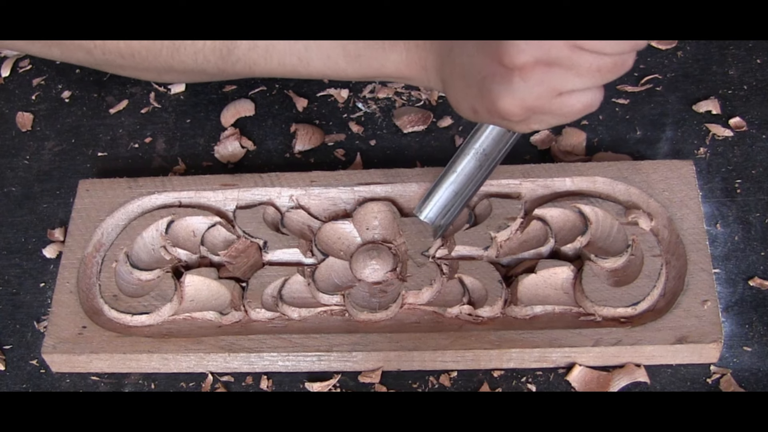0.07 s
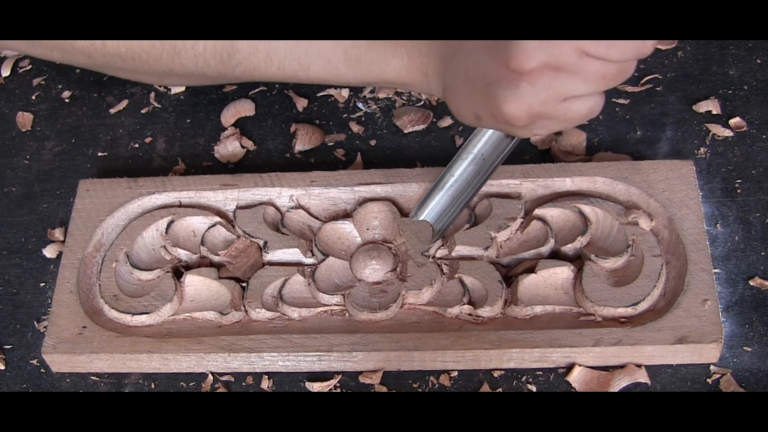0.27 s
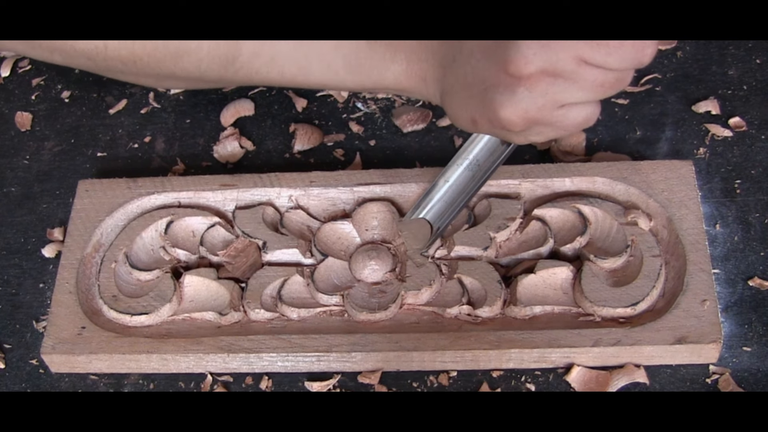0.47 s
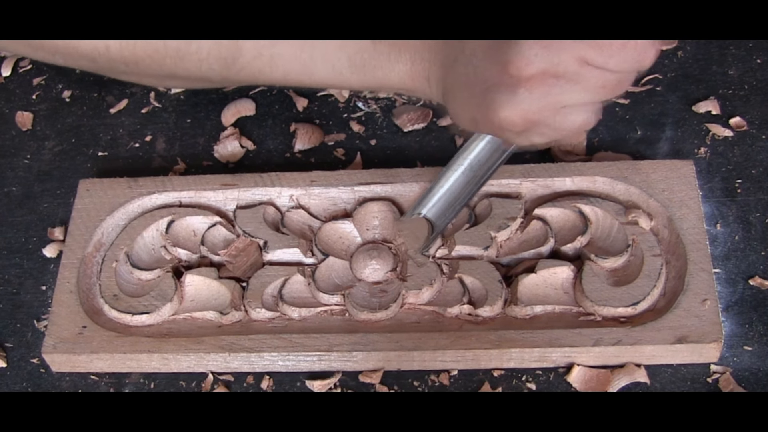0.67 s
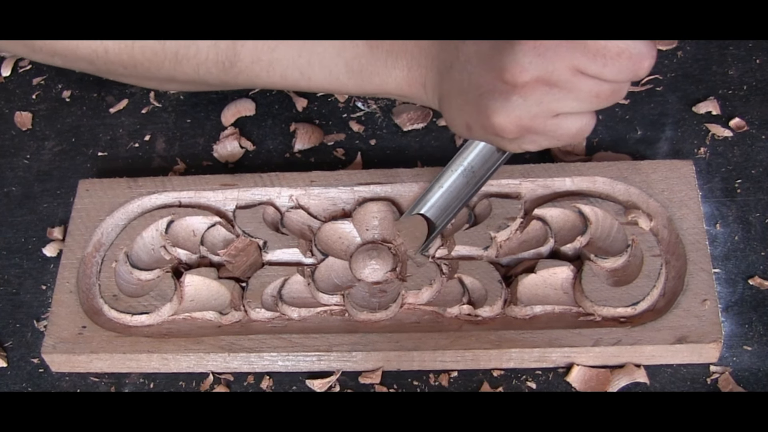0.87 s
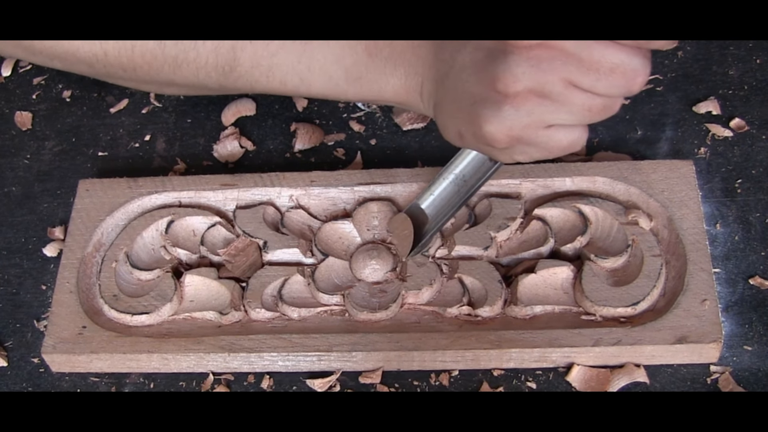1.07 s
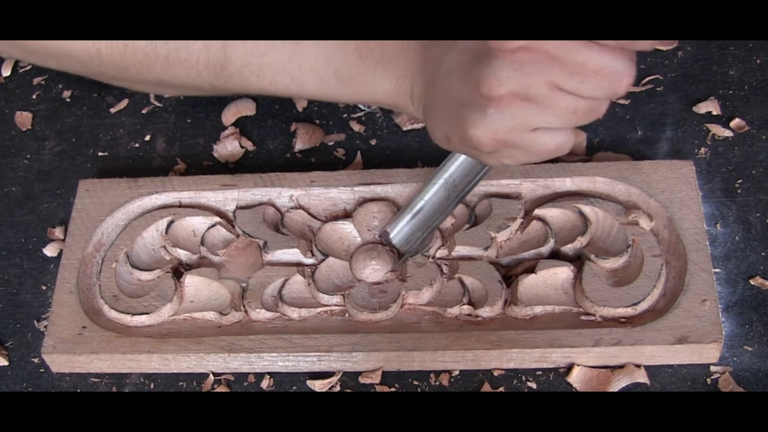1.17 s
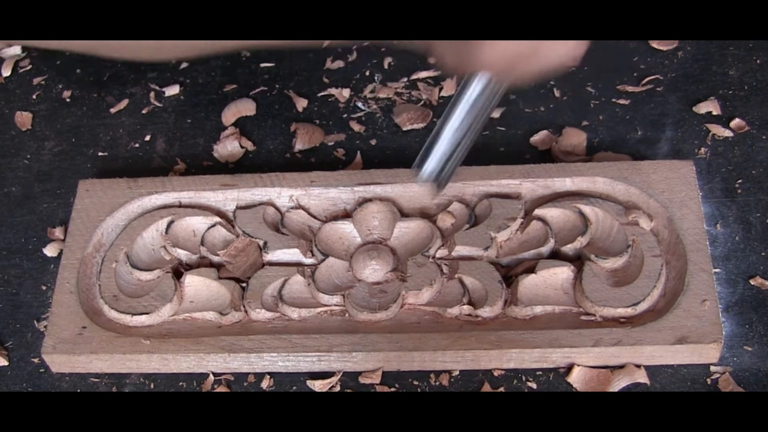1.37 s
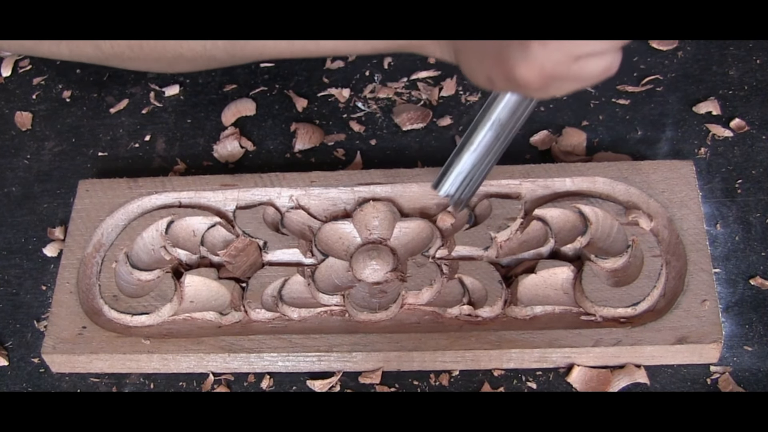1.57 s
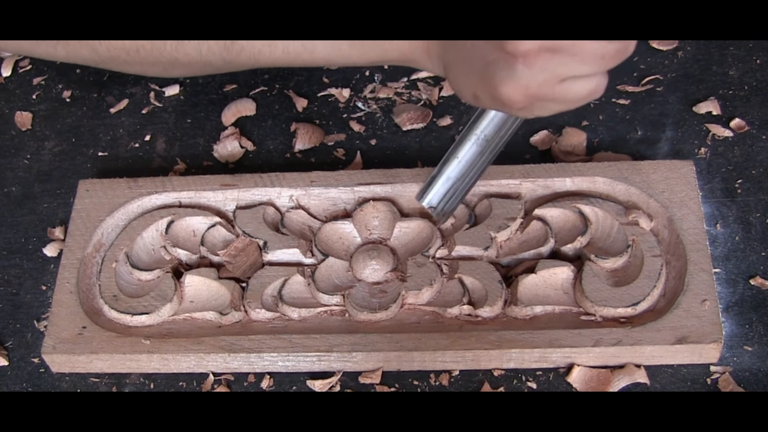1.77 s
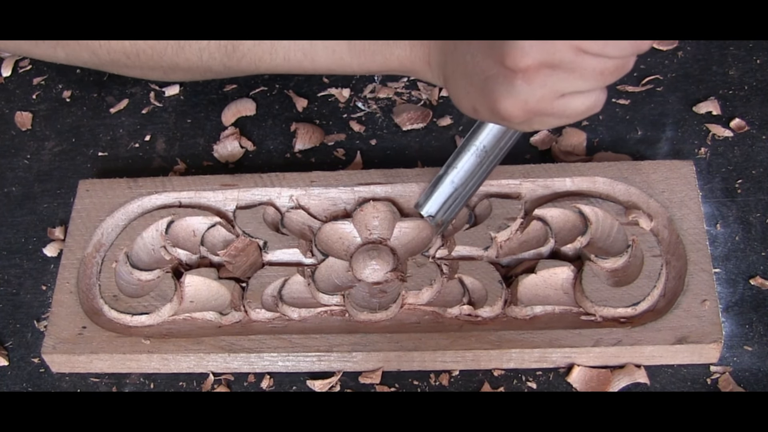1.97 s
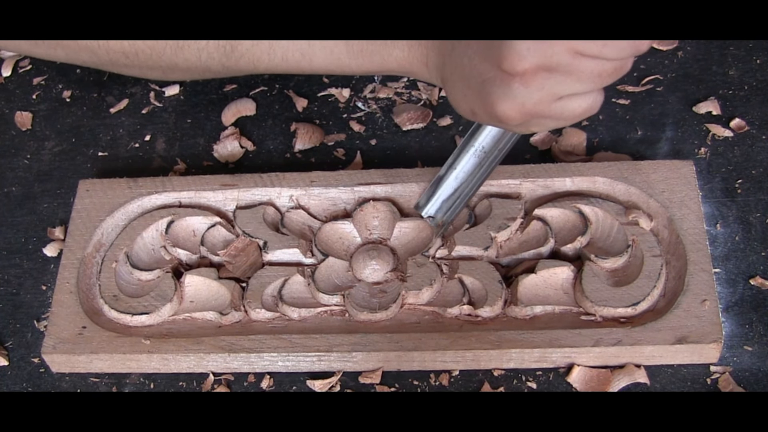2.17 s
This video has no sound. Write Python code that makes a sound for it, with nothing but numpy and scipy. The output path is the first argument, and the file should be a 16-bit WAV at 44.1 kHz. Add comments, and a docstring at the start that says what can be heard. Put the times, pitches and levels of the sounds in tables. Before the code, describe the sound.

A mallet taps a carving gouge into a wooden board: the fading tail of an earlier blow, then dry, cracking knocks at about 0.23, 0.49, 0.72, 0.95 and 1.17 seconds, the third hardest, the last softer and lower. Short room reflections swell after each. The gouge lifts with a tick at 1.34, a chip drops faintly at 1.64, and very soft bumps follow at 1.96 and 2.14 over low hiss.

```python
"""A wooden mallet taps a carving gouge into a board clamped on a bench in a small workshop.
Each blow is a few contacts ringing decaying modes of handle, board and bench, plus noise for crack and rustle.
Banded noise reflections fill the room; the recorder's limiter ducks under each blow and lets the tail swell back.
After the run the gouge lifts out with a tick, a chip drops (grit over short modes), and the hand settles
with soft bumps (low board modes) over a quiet room hiss of flickering noise bands."""
import sys
import numpy as np
from scipy import signal
from scipy.io import wavfile

SR = 44100
rng = np.random.default_rng(int(sys.argv[2]) if len(sys.argv) > 2 else 0)


def dump(signal):
    """Clip the signal to [-1, 1] and save it as 16-bit WAV at the path in sys.argv[1]."""
    limited = np.clip(np.atleast_2d(signal).T, -1, 1)
    pcm = np.round(limited * 32767).astype(np.int16)
    wavfile.write(sys.argv[1], SR, pcm)


def voltage_ratio(decibels):
    """Convert decibels (scalar or array-like) to amplitude ratios, 20 dB per decade."""
    exponent = np.asarray(decibels, float) / 20
    return 10 ** exponent


N = 97020
LEAD_SAMPLES = 8820
BAND_EDGES_HZ = 22 * 2 ** np.arange(0, 9.6, .5)
BLOW_T_S = np.arange(SR // 2) / SR
CLICK = 1. * (BLOW_T_S == 0)


def at_hz(points, hz):
    """Reads a table on a log-frequency axis."""
    table_hz, value = np.transpose(points)
    return np.interp(np.log(hz), np.log(table_hz), value)


def ring(clicks, hz, t60_s):
    """Two-pole resonator: a unit click sets a decaying sine of initial height 1 ringing."""
    r = voltage_ratio(-60 / (max(t60_s, .002) * SR))
    w = 2 * np.pi * hz / SR
    return signal.lfilter([0, np.sin(w)], [1, -2 * r * np.cos(w), r * r], clicks + 1e-18)


def soften(x, hz):
    """Two-pole low-pass."""
    return signal.lfilter(*signal.butter(2, min(hz, .4 * SR), fs=SR), x)


def mid_side(side_db):
    """Column of gains: mid at 0 dB, side at side_db."""
    return voltage_ratio(np.array([[0], [side_db]]))


def bands(length):
    """Yields centre and mid/side noise of each half-octave band; neighbours use separate noises."""
    white = rng.standard_normal((2, 2, length + 8000))
    for k, (low, high) in enumerate(zip(BAND_EDGES_HZ, BAND_EDGES_HZ[1:])):
        sos = signal.butter(2, [low, high], "band", fs=SR, output="sos")
        yield np.sqrt(low * high), signal.sosfilt(sos, white[k % 2])[:, 8000:]


def add(out, start_s, sound):
    """Lays a sound into the lead-in-padded track."""
    i = LEAD_SAMPLES + int(start_s * SR)
    out[..., i:i + sound.shape[-1]] += sound[..., :out.shape[-1] - i]


BENCH_UNDER_HZ = 650
COLOUR_DB, COLOUR_OCTAVES = 2.5, 0.5


def mode_lift_db(hz, bench_db, colour_hz):
    """Each blow's own bench_db lifts the low bench modes; modes near its strongest colour are lifted too."""
    bump = np.exp(-(np.log2(hz / colour_hz) / COLOUR_OCTAVES) ** 2)
    return bench_db * (hz < BENCH_UNDER_HZ) + COLOUR_DB * bump


# Handle, board and bench. Each row: mode in Hz, relative level in dB, t60 in s.
WOOD_MODES = [(175.7, -15.5, 0.051), (276, -8, 0.04), (421, -11.5, 0.059), (531, -8, 0.05745),
              (792, 6, 0.012), (984, -1, 0.066), (1127, 1, 0.045), (1354, 3.5, 0.012), (1679, -1, 0.048),
              (1970, -2, 0.026), (2338, 2, 0.026), (2800, -8.5, 0.065), (2958, -4.5, 0.027),
              (3800, 4.5, 0.0082), (4500, -9, 0.0065), (6100, -10, 0.023)]
CONTACT_COUNT, CONTACT_SPAN_S, CONTACT_LOSS_DB, MODE_SPREAD_DB = 6, .008, 3, 4


def wood(bench_db, colour_hz, lean):
    """The edge jerks forward in quick contacts, weaker on average, that ring every wood mode; mid and side."""
    jitter = np.r_[0, rng.uniform(-.4, .4, CONTACT_COUNT - 1)]
    contact_s = (np.arange(CONTACT_COUNT) + jitter) * CONTACT_SPAN_S / CONTACT_COUNT
    body = 0
    for k, (hz, level_db, t60_s) in enumerate(WOOD_MODES):
        spread_db = MODE_SPREAD_DB * rng.standard_normal(CONTACT_COUNT)
        clicks = np.zeros(len(BLOW_T_S))
        clicks[(contact_s * SR).astype(int)] = voltage_ratio(-CONTACT_LOSS_DB * np.arange(CONTACT_COUNT) + spread_db)
        gain = (-1) ** k * voltage_ratio(level_db + mode_lift_db(hz, bench_db, colour_hz))
        body = body + gain * ring(clicks, hz, t60_s) * [[1], [lean[k]]]
    return body


CRACK_T60_S, CRACK_CUTOFF_RATIO, CRACK_SIDE_DB = 0.025, 1.505, -10.5   # ratio to contact hardness


def crack(level_db, hard_hz):
    """Fibres splitting: a low-passed noise burst; mid and side."""
    noise = rng.standard_normal((2, len(BLOW_T_S)))
    burst = voltage_ratio(level_db - 60 * BLOW_T_S / CRACK_T60_S) * noise
    return soften(burst, CRACK_CUTOFF_RATIO * hard_hz) * mid_side(CRACK_SIDE_DB)


RUSTLE_T60_S, RUSTLE_LOW_HZ, RUSTLE_HIGH_HZ = 0.65, 300, 2460


def rustle(level_db):
    """Board and shavings shudder on after the blow: slowly dying band-passed noise."""
    noise = voltage_ratio(level_db - 60 * BLOW_T_S / RUSTLE_T60_S) * rng.standard_normal(len(BLOW_T_S))
    return signal.lfilter(*signal.butter(1, (RUSTLE_LOW_HZ, RUSTLE_HIGH_HZ), "band", fs=SR), noise)


# Narrow modes of board and steel that ring on. Each row: mode in Hz, relative level in dB, t60 in s.
LINGER_MODES = [(418, -44, .15), (566, -45, .14), (790, -45, .13), (964, -41, .14), (1140, -43, .13),
                (1340, -45, .12), (1690, -42, .13), (1915, -45, .12), (2300, -42, .1), (2475, -43, .12),
                (2720, -47, .11), (3225, -50, .11), (3750, -51, .1), (4540, -53, .1)]
LINGER_SPREAD_DB = 4


def linger(bench_db, colour_hz):
    """One click rings the narrow modes, each at a level that varies from blow to blow."""
    out = 0
    for hz, level_db, t60_s in LINGER_MODES:
        spread_db = LINGER_SPREAD_DB * rng.standard_normal()
        gain = voltage_ratio(level_db + mode_lift_db(hz, bench_db, colour_hz) + spread_db)
        out = out + gain * ring(CLICK, hz, t60_s)
    return out


# Low modes of bench and room. Each row: mode in Hz, relative level in dB, t60 in s.
BOOM_MODES = [(80, -44, .36), (140, -43, .2), (184, -32, .17), (224, -35, .19), (280, -35, .12)]


def boom():
    """One click rings the low modes, which boom on."""
    return sum(voltage_ratio(db) * ring(CLICK, hz, t60_s) for hz, db, t60_s in BOOM_MODES)


# Bench top and nearest wall. Each row: delay in s, level in dB.
NEAR_ECHOES = [(.0065, -10), (0.0144, -12.5)]


def near_echoes(direct):
    """Delayed, weaker copies of the direct blow."""
    return sum(voltage_ratio(db) * np.interp(BLOW_T_S - delay_s, BLOW_T_S, direct, left=0) for delay_s, db in NEAR_ECHOES)


# Each row: start in seconds, level in dB before the limiter, contact hardness (low-pass) in Hz,
# lift of the low bench modes in dB, rustle in dB, crack in dB, strongest colour in Hz.
BLOWS = [(0.2301, 11.5, 3250, 5.5, -68.5, -9.5, 2300), (0.4909, 12.5, 3800, 6, -59, -1, 2350),
         (0.7174, 17, 3959, 0.9, -62, -4, 2450), (0.9459, 10, 3800, 3, -56.5, -3, 2230),
         (1.1658, 5.5, 3160, 9.5, -56, -1, 3000)]
# The blow before, heard only as a tail: the columns of BLOWS without the start.
EARLIER_BLOW = (10, 3508.5, 3.5, -58.5, -3, 2400)
EARLIER_START_S = -.1
WOOD_DB, MODE_SIDE_DB, SPREAD_DB = -10.5, -21, -11
BOARD_SILENT_UNDER_HZ = 130   # the small board radiates no deep bass


def mallet():
    """Each blow sums modes, crack, echoes and rustle; rows: mid, side, knock sent to the walls."""
    out = np.zeros((3, N + LEAD_SAMPLES))
    lean = voltage_ratio(MODE_SIDE_DB) * rng.choice([-1, 1], len(WOOD_MODES))   # each mode leans to its own side
    low_boom = boom()
    board_cut = signal.butter(2, BOARD_SILENT_UNDER_HZ, "high", fs=SR)
    for blow in [(EARLIER_START_S, *EARLIER_BLOW), *BLOWS]:
        start_s, level_db, hard_hz, bench_db, rustle_db, crack_db, colour_hz = blow
        body = soften(wood(bench_db, colour_hz, lean), hard_hz)
        mid, side = voltage_ratio(WOOD_DB) * signal.lfilter(*board_cut, body + crack(crack_db, hard_hz))
        tail = rustle(rustle_db) + linger(bench_db, colour_hz) + voltage_ratio(bench_db) * low_boom
        # the walls receive all directions summed, so the knock is smooth in colour
        knock = soften(CLICK, hard_hz) + (voltage_ratio(bench_db) - 1) * soften(CLICK, BENCH_UNDER_HZ)
        rows = np.array([mid + near_echoes(mid) + tail, side, voltage_ratio(SPREAD_DB) * knock])
        add(out, start_s, voltage_ratio(level_db) * rows)
    return out


# Reverberation time. Each row: frequency in Hz, t60 in s.
ROOM_T60 = [(60, 0.7), (160, 0.18), (420, 0.21), (1100, 0.17), (2900, 0.13), (7700, 0.12), (15000, .09)]
# Reflection colour. Each row: frequency in Hz, relative level in dB.
ROOM_COLOUR = [(40, -25.5), (80, -25), (115, -20.5), (190, -9.5), (300, -4.5), (500, -0.5), (1100, 8),
               (2400, 8.5), (4500, -2), (9000, -8), (15000, -13)]
# Reflection width. Each row: frequency in Hz, side relative to mid in dB.
ROOM_SIDE = [(60, -24), (300, -15.5), (1000, -4.5), (3000, -0.5), (12000, -3.5)]
ROOM_BUILD_S, ROOM_PATCHY_DB, ROOM_PATCHES_PER_S = 0.006, 1.5, 98


def workshop(spread):
    """Dense, clumped reflections build up and die band by band; mid and side."""
    t = BLOW_T_S
    echo = 0
    for hz, band in bands(len(t)):
        clumps = np.interp(t * ROOM_PATCHES_PER_S, np.arange(100), rng.standard_normal(100))
        level_db = at_hz(ROOM_COLOUR, hz) - 60 * t / at_hz(ROOM_T60, hz) + ROOM_PATCHY_DB * clumps
        echo = echo + voltage_ratio(level_db) * band * mid_side(at_hz(ROOM_SIDE, hz))
    echo = echo * (1 - np.exp(-t / ROOM_BUILD_S))
    return signal.fftconvolve(spread[None], echo, axes=1)[:, :len(spread)]


# Each row: frequency in Hz, relative density in dB per Hz.
HISS_COLOUR = [(15, -40), (25, -0.5), (65, 2), (105, -1), (190, 5.5), (280, -1.5), (840, -8), (988, -15),
               (1160, -9.5), (16000, -33)]
# Each row: frequency in Hz, side relative to mid in dB.
HISS_SIDE = [(60, -17.5), (500, -1), (4000, -0.5), (15000, -1.5)]
HISS_MID_RMS_DB, HISS_FLICKER_DB, HISS_FLICKER_PER_S = -60.5, 0.5, 11   # level before the recorder


def hiss():
    """Room air and microphone noise, each band flickering a little; mid and side."""
    out = 0
    for hz, band in bands(N):
        flicker = np.interp(np.arange(N) / SR * HISS_FLICKER_PER_S, np.arange(100), rng.standard_normal(100))
        gain = voltage_ratio(at_hz(HISS_COLOUR, hz) + HISS_FLICKER_DB * flicker)
        out = out + gain * band * mid_side(at_hz(HISS_SIDE, hz))
    return voltage_ratio(HISS_MID_RMS_DB) * out / np.std(out[0])


# Steel edge leaving the cut, then a chip landing. Each row: start in seconds, level in dB,
# time for the grit to fall 20 dB in s, grit from Hz, grit to Hz.
TICKS = [(1.3393, -23, 0.005, 900, 7500), (1.6392, -33.5, 0.017, 2300, 6000)]
# One list per tick. Each row: mode in Hz, level relative to the tick in dB, t60 in s.
TICK_MODES = [
    [(3950, -11, .025), (5750, -18, .02), (1400, -14, .015)],
    [(2750, -7, .012), (3200, -17, .06), (5100, -8, .02)],
]
# The board answers the first tick: start in seconds, level in dB, from Hz, to Hz,
# time constant of the pitch fall in s, t60 in s.
BOARD_KNOCK = (1.3412, -28, 700, 400, .004, .035)


def ticks():
    """Milliseconds of bright grit over short modes, and one board knock falling in pitch."""
    out = np.zeros(N + LEAD_SAMPLES)
    t = np.arange(SR // 8) / SR
    for (start_s, level_db, length_s, low_hz, high_hz), modes in zip(TICKS, TICK_MODES):
        noise = rng.standard_normal(len(t)) * voltage_ratio(-20 * t / length_s)
        grit = signal.lfilter(*signal.butter(2, (low_hz, high_hz), "band", fs=SR), noise)
        ringing = sum(voltage_ratio(db) * ring(1. * (t == 0), hz, t60_s) for hz, db, t60_s in modes)
        add(out, start_s, voltage_ratio(level_db) * (grit + ringing))
    start_s, level_db, from_hz, to_hz, fall_s, t60_s = BOARD_KNOCK
    pitch_hz = to_hz + (from_hz - to_hz) * np.exp(-t / fall_s)
    add(out, start_s, voltage_ratio(level_db - 60 * t / t60_s) * np.sin(2 * np.pi * np.cumsum(pitch_hz) / SR))
    return out


# The hand on the board. Each row: start in seconds, level in dB.
BUMPS = [(1.958, -47.5), (2.137, -51.5)]
# Each row: mode in Hz, relative level in dB, t60 in s.
BUMP_MODES = [(212, 2.5, 0.054), (451.7, -5, 0.044), (1222, -9.5, 0.034)]
BUMP_SOFT_HZ = 900


def bumps():
    """A soft, low-passed push into the low modes of the board."""
    out = np.zeros(N + LEAD_SAMPLES)
    click = 1. * (np.arange(SR // 4) == 0)
    ringing = sum(voltage_ratio(db) * ring(click, hz, t60_s) for hz, db, t60_s in BUMP_MODES)
    sound = soften(ringing, BUMP_SOFT_HZ)
    for start_s, level_db in BUMPS:
        add(out, start_s, voltage_ratio(level_db) * sound)
    return out


SMALL_ROOM_DB = -37   # ticks and bumps sent to the walls
SMALL_SIDE_SLOPE = .15   # side of ticks and bumps, growing with pitch


def scene():
    """All sources in the room, mid and side turned to left and right."""
    small = ticks() + bumps()
    mid, side, spread = mallet()
    direct = np.array([mid + small, side + SMALL_SIDE_SLOPE * np.diff(small, prepend=0)])
    reflected = workshop(spread + voltage_ratio(SMALL_ROOM_DB) * small)
    mid, side = (direct + reflected)[:, LEAD_SAMPLES:] + hiss()
    return np.array([mid + side, mid - side])


def band_limit(x):
    """A steep low-pass at the top of the band."""
    return signal.sosfilt(signal.butter(12, 16630, fs=SR, output="sos"), x)


LIMIT_DB, LIMIT_SHARE = -6, .95   # share of the held overshoot that is taken off
HOLD_FALL_DB_PER_S, ATTACK_S, LOOK_AHEAD_S = 215.5, 0.0013, 0.001
CLIP_TOP, MIC_CUT_HZ = 1.3, 70


def record(dry):
    """A limiter with quick attack and steady release, soft clipping, then a bass cut."""
    t = np.arange(N) / SR
    peak_db = 20 * np.log10(np.abs(dry).max(axis=0) + 1e-9)
    over_db = np.maximum(peak_db - LIMIT_DB, 0)
    fall_db = HOLD_FALL_DB_PER_S * t
    held_db = np.maximum(np.maximum.accumulate(over_db + fall_db) - fall_db, 0)
    r = np.exp(-1 / (ATTACK_S * SR))
    smooth_db = signal.lfilter([1 - r], [1, -r], held_db)
    duck_db = LIMIT_SHARE * np.interp(t + LOOK_AHEAD_S, t, smooth_db)
    limited = dry * voltage_ratio(-duck_db)
    clipped = CLIP_TOP * np.tanh(limited / CLIP_TOP)
    mix = signal.lfilter(*signal.butter(2, MIC_CUT_HZ, "high", fs=SR), clipped)
    return band_limit(mix)


dry = scene()
out = record(dry)
dump(out)
```